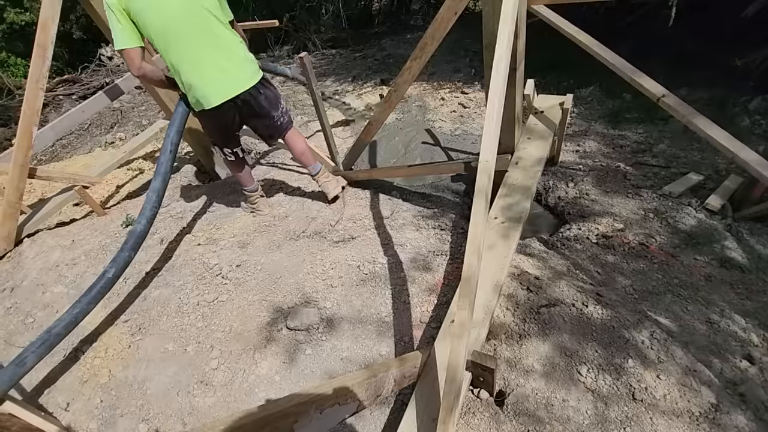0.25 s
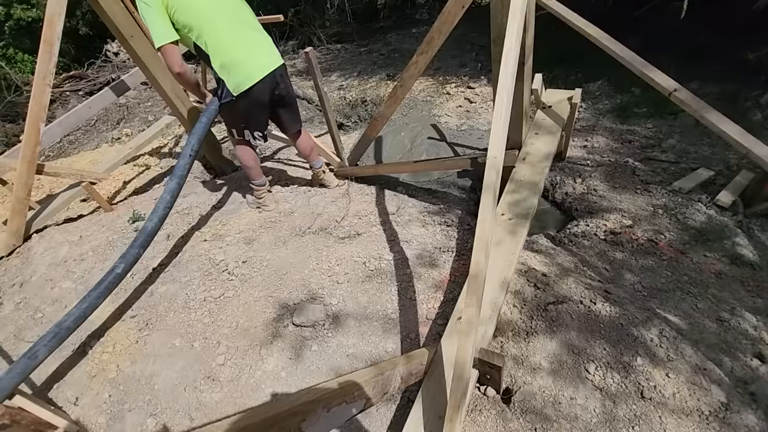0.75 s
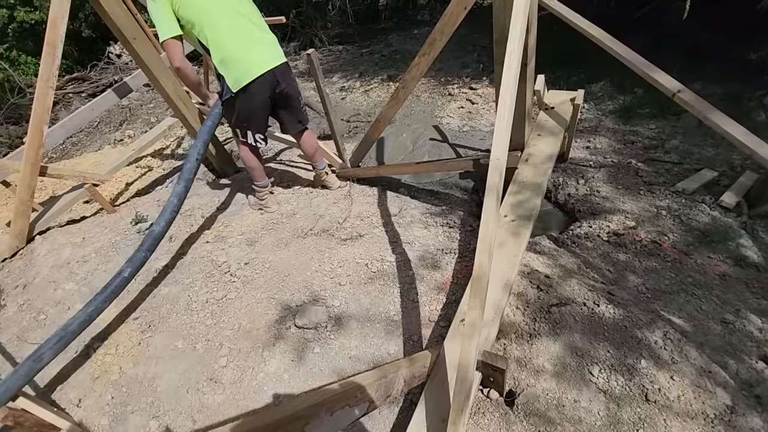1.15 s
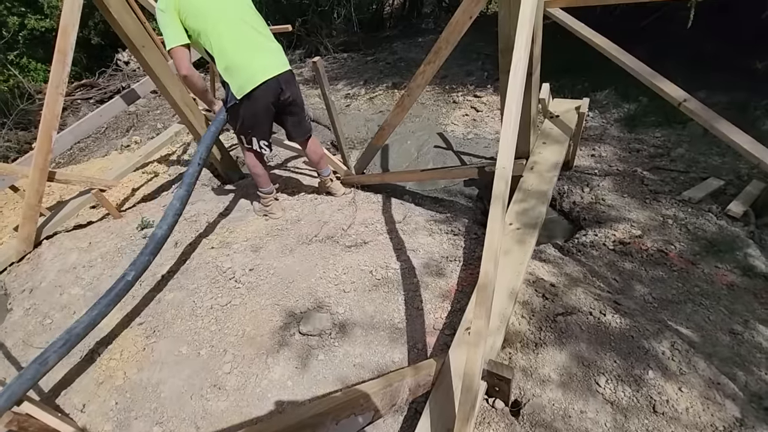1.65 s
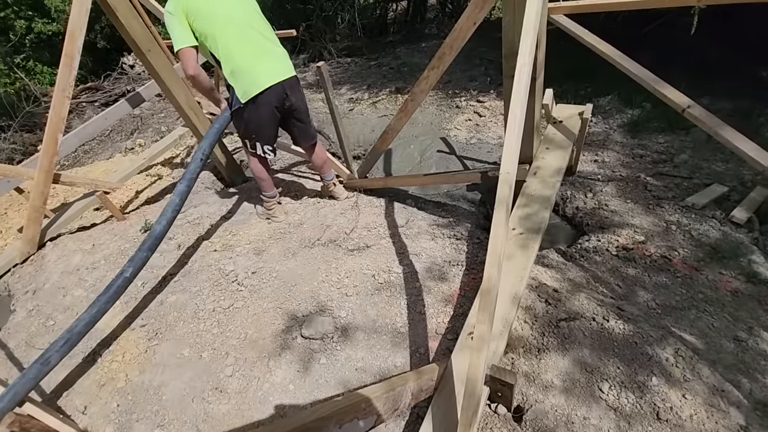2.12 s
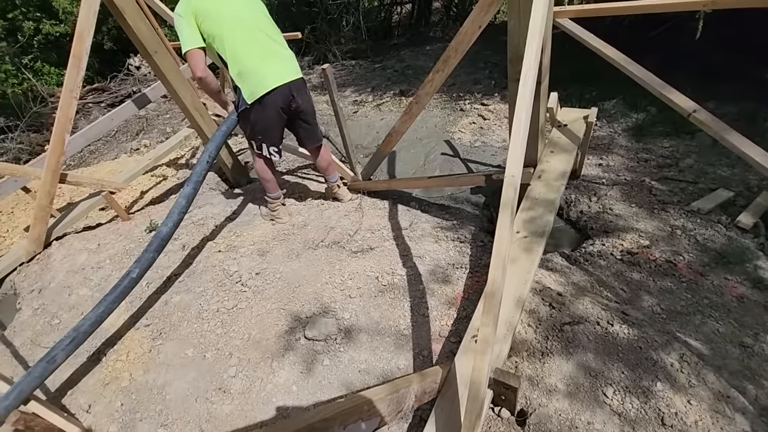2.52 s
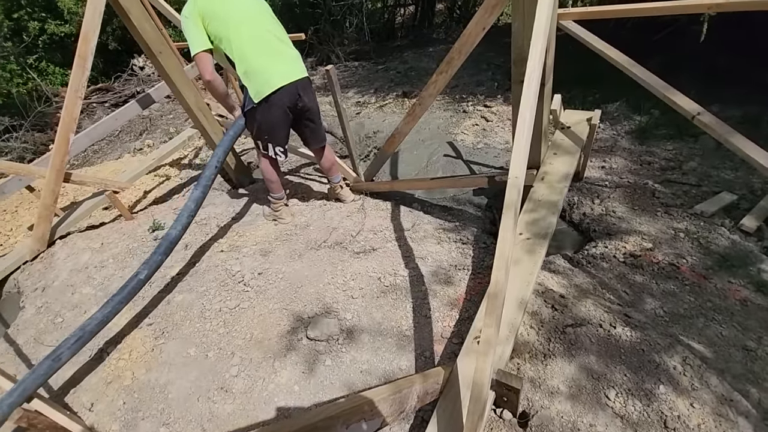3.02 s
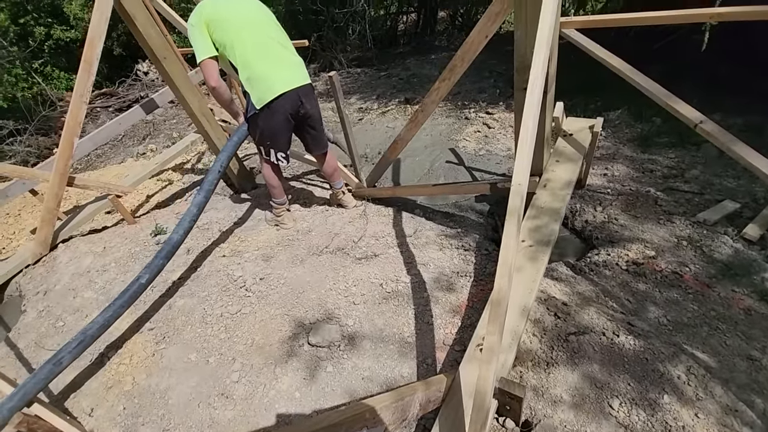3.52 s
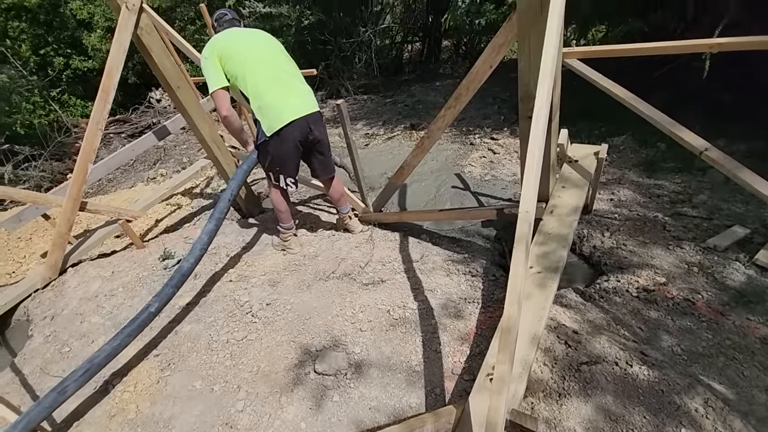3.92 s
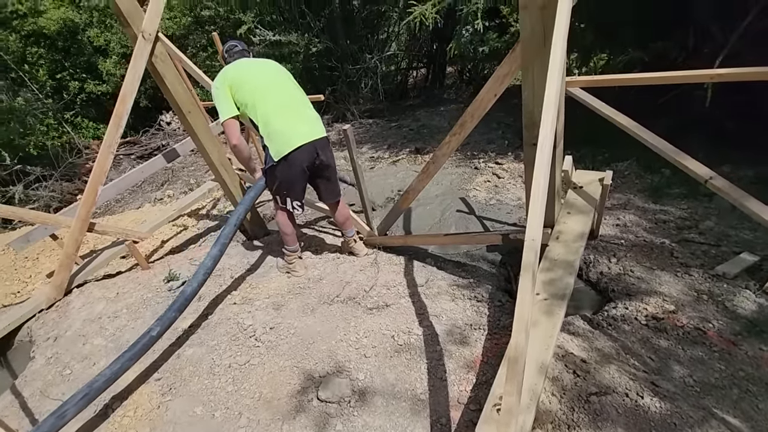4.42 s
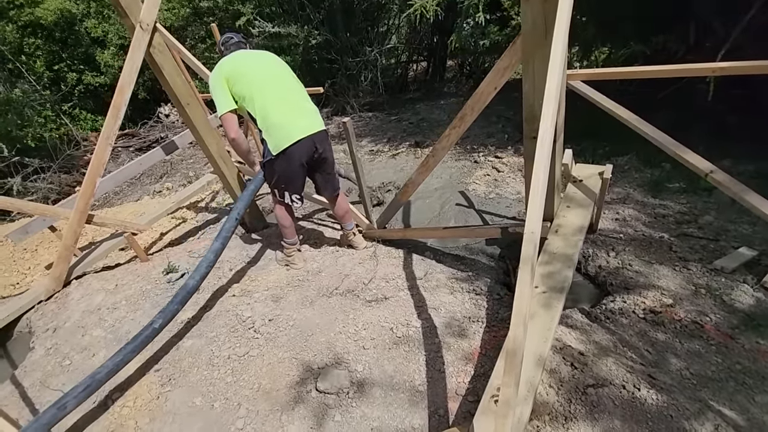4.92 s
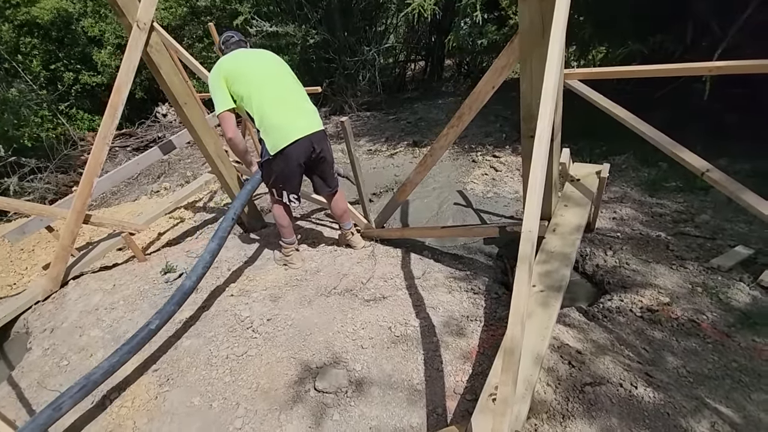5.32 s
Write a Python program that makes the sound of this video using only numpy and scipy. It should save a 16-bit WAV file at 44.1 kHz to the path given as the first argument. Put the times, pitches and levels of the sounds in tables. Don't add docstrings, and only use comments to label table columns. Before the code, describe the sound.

At an outdoor building site, a pump engine some way off holds a low, buzzing hum near 68 Hz with slight wavering and soft block rumble, from start to end without cutting off. Close to the stereo microphone, wet concrete leaves a hose as a continuous gritty trickle of slop, stone rattle and fine spray. From 0 to 1 second it is busiest: hard stone smacks, short gushes and bright droplet ticks, peaking with a sharp knock at about 0.7. After 1.2 it calms, with wet lumps landing at about 1.4, 2.15 and 2.55, then a run of broad, hollow splats between 3.1 and 4.8. Small stone clicks, thin spurts and faint hisses of squeezed air come between. A short, firm slap falls at 5.2, then another splat and a stone click with a gush near 5.4 to 5.5. The sound is dry and open, without obvious echo.

```python
import sys
import numpy as np
from scipy import signal
from scipy.fft import rfft, irfft, next_fast_len
from scipy.io import wavfile
from scipy.ndimage import uniform_filter1d

SR = 44100
rng = np.random.default_rng(int(sys.argv[2]) if len(sys.argv) > 2 else 0)


def natural_amplitude(level_db):
    exponent = np.asarray(level_db, float) / 20
    return 10 ** exponent


def digitize_waveform(pressure):
    field = np.atleast_2d(pressure).T
    bounded = np.clip(field, -1, 1)
    quanta = np.round(bounded * 32767).astype(np.int16)
    wavfile.write(sys.argv[1], SR, quanta)


N = 245195


def level(x, db):
    return x * natural_amplitude(db) / np.sqrt(np.mean(x ** 2))


def columns(table):
    s, *cols = np.transpose(table)
    t = np.arange(N) / SR
    return [np.interp(t, s, col) for col in cols]


def colour(x, table):
    hz, db = np.transpose(table)
    size = next_fast_len(N)
    f_hz = np.maximum(np.fft.rfftfreq(size, 1 / SR), 1)
    gain = natural_amplitude(np.interp(np.log(f_hz), np.log(hz), db, left=-90, right=-90))
    return irfft(rfft(x, size) * gain, size)[..., :N]


def band(low_hz, high_hz, order):
    return signal.butter(order, [low_hz, high_hz], "band", fs=SR, output="sos")


def walk(rate_hz):
    hold = int(SR / rate_hz)
    held = np.repeat(rng.standard_normal(N // 200), hold)[:N]
    return 1.3 * uniform_filter1d(uniform_filter1d(held, hold), hold)


def ports(near, wide, share, pan_db, lead):
    direct = np.array([np.roll(near, -int(round(lead))), near])
    both = np.sqrt(share) * direct + np.sqrt(1 - share) * wide
    return both * natural_amplitude(np.array([[pan_db], [-pan_db]]) / 2)


def patter(rate_hz, spread_db, smear_ms, bed):
    hit = rng.random(N) < rate_hz / SR
    size = natural_amplitude(spread_db * np.minimum(rng.exponential(size=N), 4))
    burst = signal.lfilter([1], [1, -np.exp(-1000 / (smear_ms * SR))], hit * size)
    return (level(burst, 0) + bed) * rng.standard_normal((3, N))


def swell(length_ms, rise_ms):
    ms = 1000 * np.arange(SR // 4) / SR
    return (1 - np.exp(-ms / rise_ms)) * np.exp(-(ms / max(length_ms, 5)) ** 1.28)


def outflow():
    # t/s, flow/dB, spatter/dB
    flow = [(0, 4, 2), (.085, 3, -2.5), (.13, 3, 2), (.56, 3, 1.5), (.95, 5, 2), (1.11, 0, 2),
            (1.42, 2, 1.5), (1.65, 0, 1), (2.2, -0.2, 1.5), (2.62, 2.5, -4.5), (3.0, 0.5, 1.2),
            (3.5, 1.5, -1.5), (3.93, 2, -4), (4.3, 3, -1), (4.7, 2.5, -2.5), (5.03, 3.5, 1.5),
            (5.35, 1.5, 3), (5.56, 4.5, 0)]
    # level at rest/dB, flow slope/(dB/dB), spatter slope/(dB/dB)
    trickle = [
        (-50.5, 1.1, -0.2),
        (-45, 1.06, 0.8),
        (-46.5, 0.4, 0.9),
        (-50.5, 0.43, 1.13),
    ]
    # t/s, stone peak/dB, spray re stones/dB, length/ms
    gushes = [(0.0987, -30, -6, 18), (0.209, -28, -10, 83), (0.2713, -23.5, -5.5, 44),
              (0.4255, -20, -11, 19), (0.4983, -30, -4, 88), (0.5694, -35, -11, 69),
              (0.6462, -21, -8.5, 92), (0.696, -15, -8.5, 26), (0.7217, -17.5, -9, 15),
              (0.7706, -25.5, -6, 39), (0.8132, -23.5, -26, 59), (0.8885, -22, -19, 13),
              (0.935, -23.5, -21, 30), (0.9778, -19, -21, 13), (1.248, -26, -14, 57), (1.318, -29, -19, 25),
              (1.5494, -41, 3, 33), (1.844, -28, -2, 30.7), (2.114, -33, -3, 11), (2.3294, -32.5, -4, 90),
              (2.9498, -34, -4, 100), (3.515, -38, 6.5, 19.5), (4.0343, -29, -5, 30),
              (4.2534, -30, -8, 34.3), (4.6135, -26.5, -7, 46), (4.641, -30, -0.5, 22),
              (4.779, -33, -18, 51), (4.861, -25, -7, 43), (5.0497, -35.5, 1, 59), (5.459, -25.5, -11, 47)]
    # f/Hz, density/dB
    slop = [(190, -25), (330, -1), (438, -9), (548, -2.5), (677, -4.5), (842, -4.5), (1020, -4.5),
            (1160, -14), (1350, -6), (1760, -15), (2970, -120)]
    stones = [(780, -26), (1330, -2), (1430, 0), (1550, -3), (1710, 3.5), (2190, 4.5), (2960, -1.5),
              (3700, -3.5), (4600, -13), (5980, -12), (10100, -120)]
    crunch = [(650, -6.5), (980, -8), (1160, -13), (1330, -4), (1510, -8), (1820, -1), (2410, -3.5),
              (2620, 0), (2880, -17), (4600, -12), (5980, -28), (10100, -120)]
    spray = [(2240, 2), (3800, 3), (4520, 2), (5920, -3.5), (6440, 0.5), (6870, -1.5), (7410, 3),
             (8690, 1.5), (10100, -4.5), (12500, -14.5), (16200, -41), (22000, -120)]
    mist = [(7060, -23), (11000, -4.5), (11300, -2), (11600, 1.5), (12300, -1), (13000, 1.5), (13700, 4.5),
            (14500, -0.5), (15200, 2), (15700, 6), (16000, 5)]

    flow_db, spatter_db = columns(flow)
    steady_db = [db + a * flow_db + b * spatter_db for db, a, b in trickle]
    gush_power = np.zeros((4, N + SR))
    for s, db, spray_db, length_ms in gushes:
        layers_db = np.array([-12, 0, spray_db + 0.5, spray_db - 6.0])
        peak = natural_amplitude(db - 9.5 + layers_db)
        at = int(s * SR)
        gush_power[:, at:at + SR // 4] += (peak[:, None] * swell(length_ms, 1.0)) ** 2
    gush = np.sqrt(gush_power[:, :N])

    out, surge = 0, walk(25.39)
    placing = [(slop, slop, 0.9, 1.2, -4), (stones, crunch, 0.75, -3.5, 5),
               (spray, spray, 0.45, -0.6, 8), (mist, mist, 0.45, 0.1, 4)]
    for db, rough, (tint, gush_tint, *place) in zip(steady_db, gush, placing):
        fine = colour(patter(1500, 2.8, 6.2, 0.41), tint)
        grit = colour(patter(700, 3.6, 0.93, 0.72), gush_tint)
        trickle_gain = natural_amplitude(db + 0.5 * surge + 0.35 * walk(12))
        out = out + level(ports(fine[0], fine[1:], *place), 0) * trickle_gain
        out = out + level(ports(grit[0], grit[1:], *place), 0) * rough
    return out


def splats():
    # t/s, peak/dB, hollow f/Hz, hollow share/dB, length/ms
    lumps = [(0.97, -27, 600, -5, 35), (1.4, -24.5, 500, -29, 59), (2.15, -26, 243, -4, 80),
             (2.154, -24, 680, 2.5, 38), (2.219, -28.5, 690, -2, 64), (2.542, -20.5, 860, -13, 55),
             (2.552, -27, 3300, 4, 19.4), (2.718, -23, 1385, -20, 60), (2.725, -32, 3303, 2, 21),
             (3.137, -19.5, 920, -15, 83), (3.489, -26, 1070, -14, 96), (3.629, -29, 1000, -11, 140),
             (3.685, -27.5, 1140, -4, 72), (3.862, -25, 1045, -1, 53), (4.252, -23, 1360, -13, 51.5),
             (4.319, -34, 534, -5, 45), (4.457, -24.5, 485.3, -21, 50), (4.789, -27, 1043, -5.5, 180),
             (5.2, -16.5, 680, -14, 18), (5.399, -21.5, 1355, -20, 94), (5.475, -30, 3620, 5, 18)]
    # f/Hz, density/dB
    slap_spectrum = [(210, -13), (350, 0.5), (417, -5.5), (697, -1), (1020, -1.5), (1160, -10.5),
                     (1300, 1.5), (1420, -1), (1660, -8.5), (2080, 0.5), (2410, -8.5), (3020, -4.5),
                     (4400, -9), (7000, -21.5), (9100, -56), (15400, -120)]

    slap = colour(patter(640, 1.3, 0.93, 6.3), slap_spectrum)
    slap = level(ports(slap[0], slap[1:], 0.28, 1.4, -4.5), 0)
    slap = np.pad(slap, ((0, 0), (0, SR)))
    thud = level(signal.sosfilt(band(170, 330, 2), rng.standard_normal(N + SR)), 0)
    out = np.zeros_like(slap)
    for s, db, hz, hollow_db, length_ms in lumps:
        thud_db = -8.5 - 7 * np.log2(hz / 700)
        at = int(s * SR)
        span = slice(at, at + SR // 4)
        hollow = signal.sosfilt(band(hz / 1.05, hz * 1.01, 1), slap[:, span])
        lump = slap[:, span] + level(hollow, hollow_db) + natural_amplitude(thud_db) * thud[span]
        out[:, span] += lump * swell(length_ms, 4.3) * natural_amplitude(db - 15.0)
    return out[:, :N]


def smacks():
    # t/s, peak/dB, f/Hz, left minus right/dB
    hits = [(0.0987, -18, 3050, -3), (0.149, -26, 2730, -1.5), (0.2748, -22, 1170, -1),
            (0.289, -20, 1480, -4), (0.333, -21, 2180, -5), (0.4262, -15.5, 1700, -5.5),
            (0.432, -17.5, 1340, 1), (0.4988, -24.5, 910, -4), (0.6458, -19, 2000, -5),
            (0.6608, -17.5, 2080, -1), (0.7021, -8.5, 1140, -1.5), (0.707, -19, 1360, -3),
            (0.7174, -15.5, 1760, -2), (0.725, -14, 2100, -6.5), (0.8135, -22, 1886, -4),
            (0.8884, -22.5, 2170, -3.5), (0.9422, -20, 1900, -4), (0.975, -25.5, 583, 2),
            (0.983, -23.5, 1970, -4), (1.212, -25, 693, 6), (1.242, -29, 650, 4), (2.771, -32, 2200, -6),
            (2.015, -32.5, 910, -2), (2.4736, -27.5, 2060, -4.5), (3.0, -26.5, 1590, -8.5),
            (4.040, -23, 2000, -6), (4.557, -32.5, 3650, -8), (4.615, -22, 1930, -5), (5.201, -29, 1420, 1),
            (5.486, -17.5, 2480, -2.5), (0.0895, -31, 1660, -1), (0.2069, -30.5, 1300, 2),
            (0.2169, -28, 1990, -1.5), (0.238, -25, 1900, -4), (0.2585, -27, 1060, -2),
            (0.305, -25, 2050, -4), (0.413, -30.5, 690, -4), (0.697, -14.5, 1700, -3),
            (0.700, -25, 1490, 0), (0.7095, -22, 890, -4), (0.752, -21.5, 2500, -1.5),
            (1.3186, -27, 1860, -1), (1.5852, -33, 1820, -1.5), (1.6362, -33, 2110, 1),
            (1.8454, -28, 2080, 1), (2.554, -28, 3200, 1.5), (2.88, -30.5, 2160, -1.5),
            (4.0157, -32, 1700, -3), (5.015, -37, 2150, -8), (5.4583, -35, 1970, -4)]
    ring_ms, ring_cycles, wet_top_hz = 2.7, 1.07, 2600

    out, t = np.zeros((2, N + 4096)), np.arange(4096) / SR
    fade = np.exp(-1000 * t / ring_ms)
    spray_band = signal.butter(2, 4500, "high", fs=SR, output="sos")
    for s, db, hz, pan_db in hits:
        noise = rng.standard_normal((4, 4096))
        click = np.sin(2 * np.pi * hz * t) + 0.59 * np.sin(2 * np.pi * 1.64 * hz * t)
        click *= np.exp(-t * hz / ring_cycles)
        grit = signal.sosfilt(band(hz / 1.06, hz * 1.12, 2), noise[:2] + 0.93 * noise[2]) * fade
        top_hz = max(1.5 * hz, wet_top_hz * natural_amplitude((db + 8.0) / 2))
        body = signal.sosfilt(band(hz / 1.52, top_hz, 2), 0.65 * click + 1.1 * grit)
        puff_db = -36.5 - db + 0.8 * (db + 19)
        puff = signal.sosfilt(spray_band, noise[:2] + 0.11 * noise[3]) * fade ** 0.13 * natural_amplitude(puff_db)
        smack = body / np.abs(body).max() + 0.63 * puff
        smack[1] = np.roll(smack[1], int(round(-1.5 * pan_db)))
        at = int(s * SR)
        out[:, at:at + 4096] += smack * natural_amplitude(db + np.array([[pan_db], [-pan_db]]) / 2)
    return out[:, :N]


def drops():
    # t/s, peak/dB, f/Hz
    ticks = [(0.0987, -27.5, 7320), (0.1206, -27, 11500), (0.1401, -26.5, 11500), (0.168, -33, 11500),
             (0.2249, -32, 13600), (0.2593, -26.5, 6690), (0.3566, -31, 8660), (0.397, -32, 7250),
             (0.4274, -27, 7850), (0.6379, -27, 13300), (0.6599, -30, 13040), (0.6848, -29, 5030),
             (0.8989, -32, 12800), (1.2416, -30, 8980), (1.4047, -31, 9030), (1.4371, -32, 8340),
             (1.478, -34, 7064), (1.5828, -35, 8280), (1.7928, -33, 13300), (2.1126, -36, 7495),
             (2.2473, -31, 13600), (2.811, -35, 6520), (2.8818, -35, 6480), (4.0317, -35, 7000),
             (4.6159, -37, 7627), (5.2869, -36, 5272), (5.3537, -36, 7110), (5.3787, -33, 5460),
             (5.477, -29, 8150)]
    decay_ms, width = 2.6, 1.3

    out, t = np.zeros((2, N + 1024)), np.arange(1024) / SR
    for s, db, hz in ticks:
        noise = rng.standard_normal((3, 1024))
        tick_band = band(hz / width, min(hz * width, SR / 2.2), 1)
        fizz = signal.sosfilt(tick_band, noise[:2] + noise[2]) * np.exp(-1000 * t / decay_ms)
        at = int(s * SR)
        out[:, at:at + 1024] += fizz / np.abs(fizz).max() * natural_amplitude(db + 1.5)
    return out[:, :N]


def sizzles():
    # middle t/s, length/s, f/Hz, level/dB
    hisses = [
        (0.14, 0.06, 11800, -56),
        (0.3, 0.15, 8500, -58),
        (1.35, 0.33, 8600, -57),
        (1.9, 0.2, 13500, -62),
        (2.2, 0.25, 7400, -62),
        (3.1, 0.2, 7200, -57),
        (3.9, 0.4, 7400, -59),
        (5.15, 0.36, 7300, -57),
        (5.2, 0.3, 13890, -59),
    ]
    width = 1.06

    t, out = np.arange(N) / SR, 0
    for s, length_s, hz, db in hisses:
        hiss = signal.sosfilt(band(hz / width, hz * width, 1), rng.standard_normal((2, N)))
        out = out + level(hiss, db) * np.exp(-((t - s) / length_s) ** 2)
    return out


def engine():
    # t/s, firing rate/Hz, tone level/dB, second-order level/dB, exhaust bark/dB
    running = [(0, 68.55, -30.5, -50, 1), (.4, 67.7, -30, -41.5, -1.5), (.9, 68.3, -29.5, -44.5, -10),
               (1.2, 68, -30, -43, 1.5), (1.45, 67.68, -30.5, -43.5, -9), (1.65, 67.98, -30, -35.5, 3),
               (2.05, 67.97, -31, -39, 4), (2.28, 68.65, -30, -35.5, 1), (2.45, 69.1, -30.5, -38, -0.5),
               (2.85, 67.95, -31, -35.5, 1.5), (3.1, 68.3, -30.5, -39, -4), (3.3, 68.27, -28.5, -38, -0.5),
               (3.9, 67.9, -30.5, -39.5, -6), (4.2, 67.8, -31, -34, -4), (4.5, 67, -33, -41, 2),
               (5.0, 67.13, -31, -46, -7), (5.2, 68.42, -29.5, -36.5, 1), (5.56, 67.7, -31.5, -69, 1.5)]
    # t/s, strength/dB, length/s
    lurches = [(.05, 1, 0.11), (0.358, 5, 0.22), (0.855, -1, 0.25), (1.347, -6, 0.13), (1.732, 4, 0.17),
               (2.256, 14, .09), (2.595, 4, 0.09), (2.876, 12.5, 0.17), (3.202, 5, 0.16),
               (3.752, 9.5, 0.041), (3.937, 13.5, 0.12), (4.164, 4, 0.098), (4.547, 3, 0.2),
               (4.947, 6, 0.13), (5.498, 8, 0.051)]
    # multiple of firing rate, level/dB
    uneven_orders = [(3 / 2, -50), (5 / 2, -51.5)]
    # multiple of firing rate, level/dB
    weak_orders = [(3.17, -58), (4.17, -61), (.5, -70)]
    # f/Hz, density/dB
    rumble_spectrum = [(12, -45), (20, -29), (41, -10), (76, -2), (91, -0.5), (113, -1.5), (151, 0),
                       (206, -4), (247, -10), (285, -10.5), (329, -30.5), (450, -35.5), (580, -66),
                       (990, -120)]
    waver_db, lead = 3.0, 3

    hz, tone_db, load_db, bark_db = columns(running)
    t = np.arange(N) / SR
    uneven = natural_amplitude(-5)
    for s, db, length_s in lurches:
        uneven = uneven + natural_amplitude(db) * np.exp(-((t - s) / length_s) ** 2)
    turn = 2 * np.pi * np.cumsum(uniform_filter1d(hz, SR // 2)) / SR
    tone = natural_amplitude(uniform_filter1d(tone_db, SR // 8) + 0.3 * walk(18)) * np.sin(turn)
    tone += natural_amplitude(load_db + 1.5 * walk(8)) * np.sin(2 * turn + 0.35 * walk(5))
    for k, db in uneven_orders:
        size = uneven * natural_amplitude(db + waver_db * walk(12))
        tone += size * np.sin(k * turn + 1.1 * walk(9))
    tone += natural_amplitude(-48 + bark_db + waver_db * walk(10)) * np.sin(3 * turn + 0.6 * walk(7))
    for k, db in weak_orders:
        tone += natural_amplitude(db + 3.2 * walk(5.22)) * np.sin(k * turn + 0.33 * walk(7))

    throb = 1 + 0.041 * np.cos(turn)
    rumble = colour(throb * rng.standard_normal((3, N)), rumble_spectrum)
    rumble = ports(rumble[0], rumble[1:], 0.96, 0, lead)
    return np.sqrt(2) * ports(tone, 0, 1, 0, lead) + level(rumble, -39)


def scene():
    return outflow() + splats() + smacks() + drops() + sizzles() + engine()


def top_cut(x):
    return signal.sosfilt(signal.butter(12, 16530, fs=SR, output="sos"), x)


def record(dry):
    top_hz, edge_hz = 15730, 40
    cut = [(1, 0), (top_hz, 0), (top_hz + edge_hz, -35), (top_hz + 5 * edge_hz, -62)]
    mix = colour(dry, cut)
    return top_cut(mix)


dry = scene()
out = record(dry)
digitize_waveform(out)
```